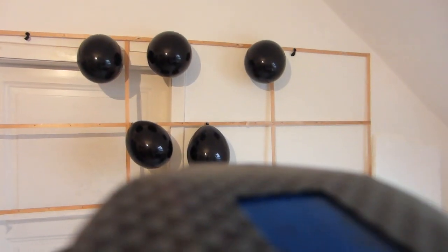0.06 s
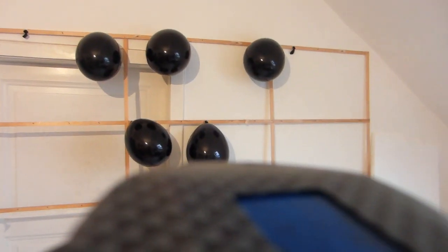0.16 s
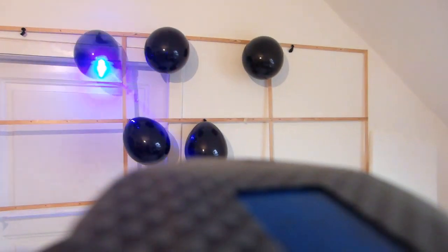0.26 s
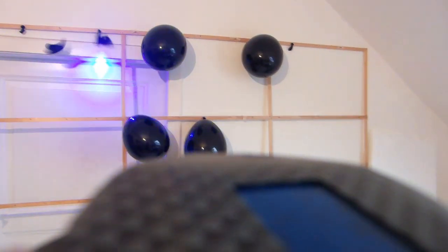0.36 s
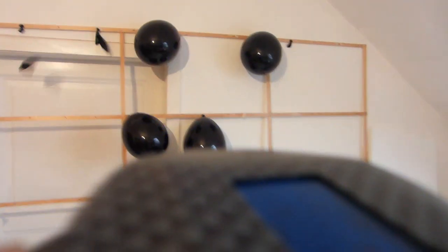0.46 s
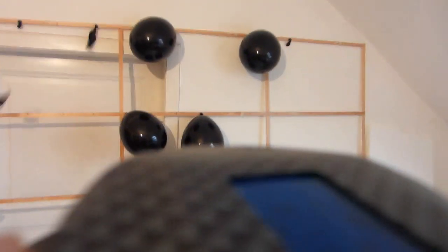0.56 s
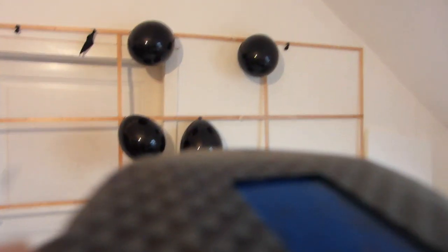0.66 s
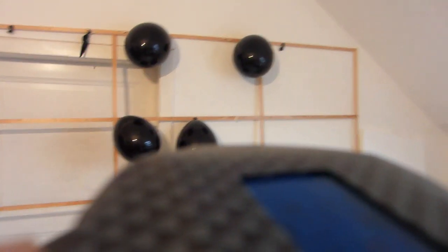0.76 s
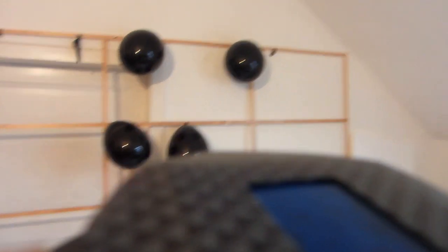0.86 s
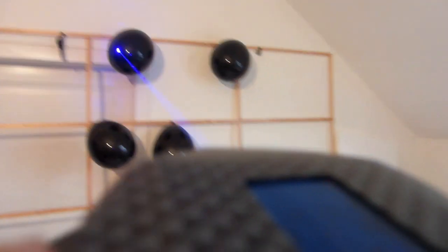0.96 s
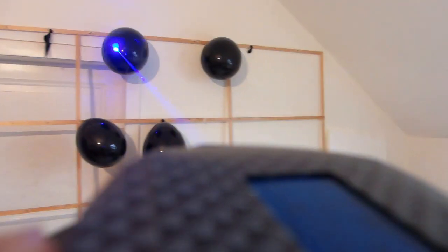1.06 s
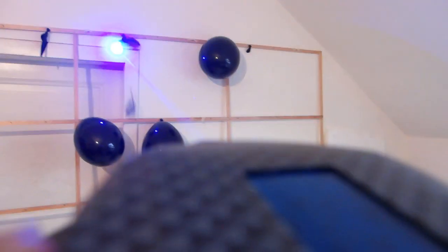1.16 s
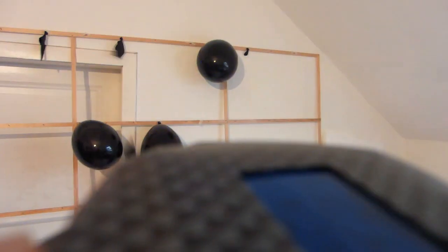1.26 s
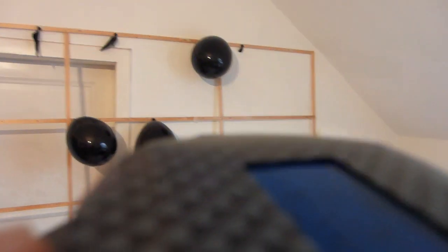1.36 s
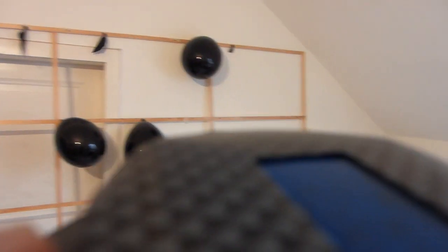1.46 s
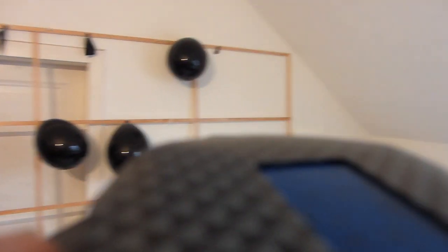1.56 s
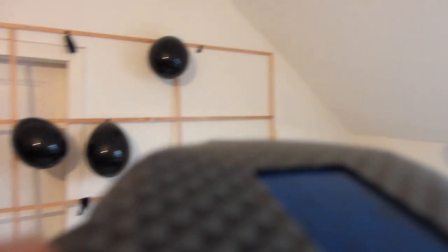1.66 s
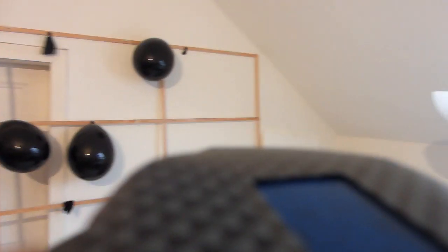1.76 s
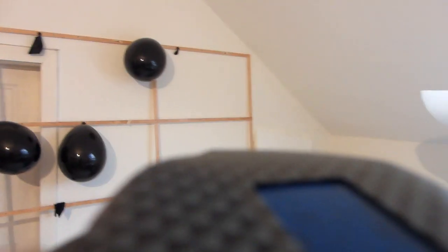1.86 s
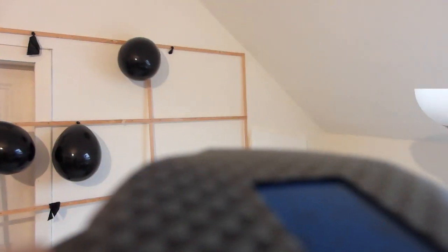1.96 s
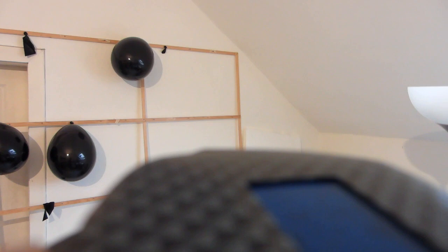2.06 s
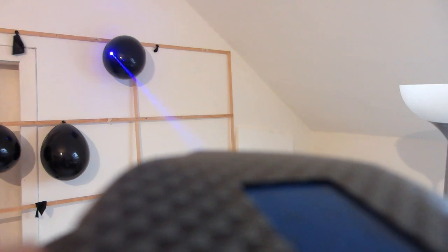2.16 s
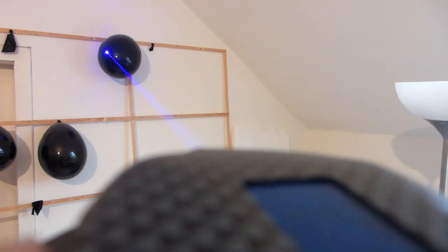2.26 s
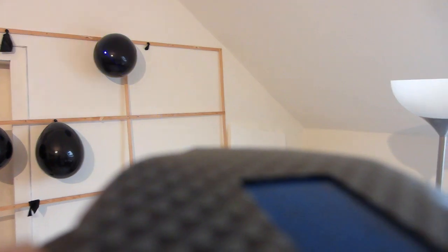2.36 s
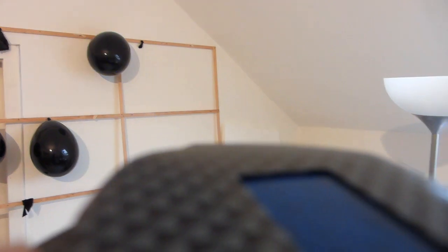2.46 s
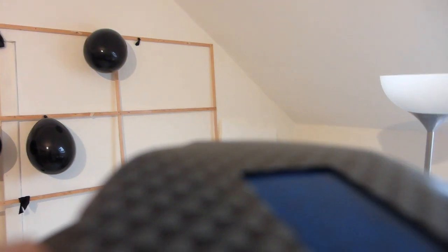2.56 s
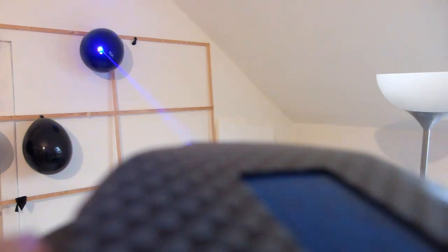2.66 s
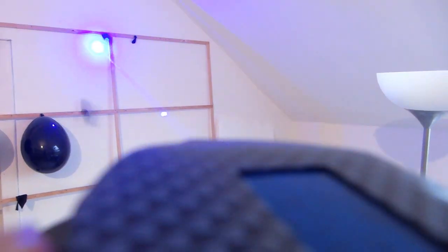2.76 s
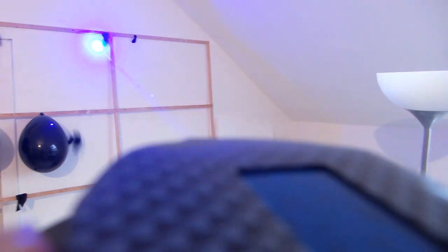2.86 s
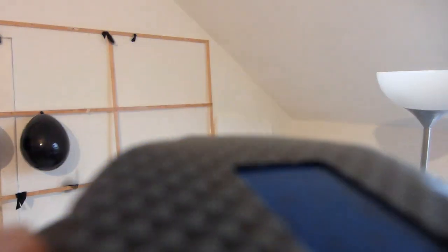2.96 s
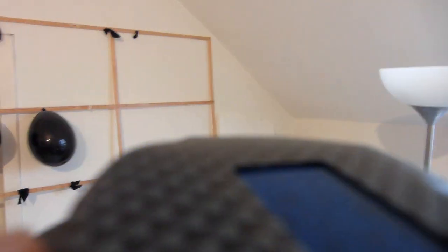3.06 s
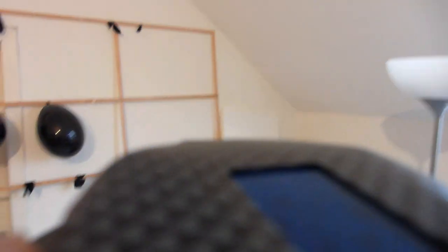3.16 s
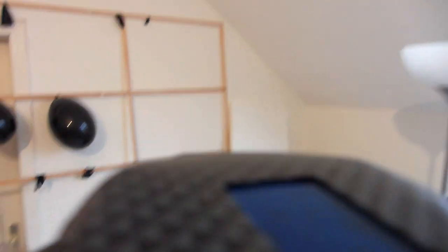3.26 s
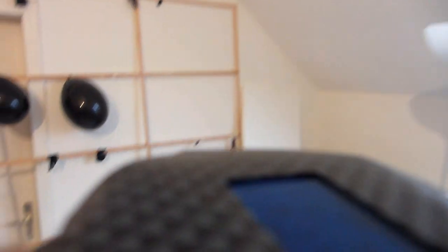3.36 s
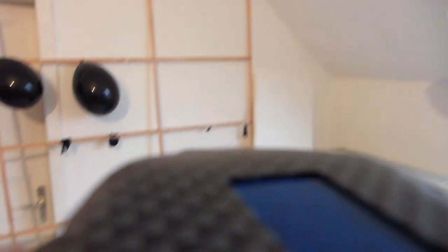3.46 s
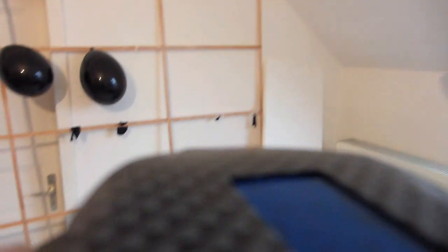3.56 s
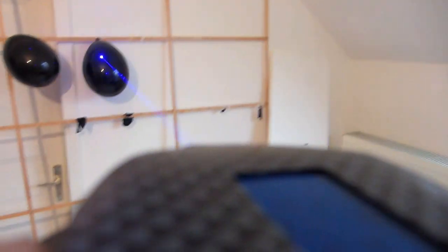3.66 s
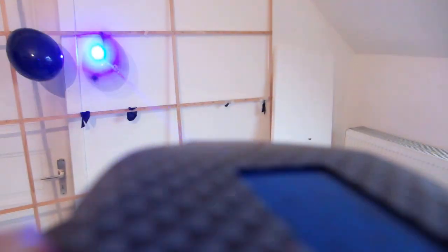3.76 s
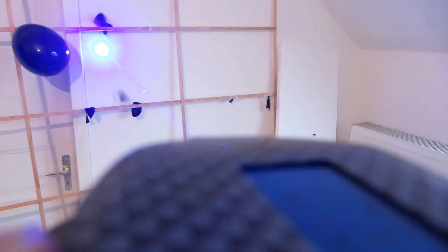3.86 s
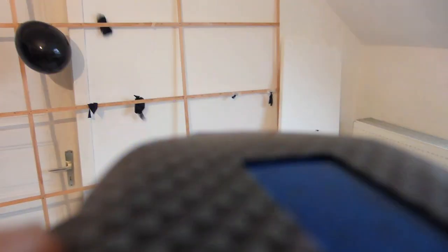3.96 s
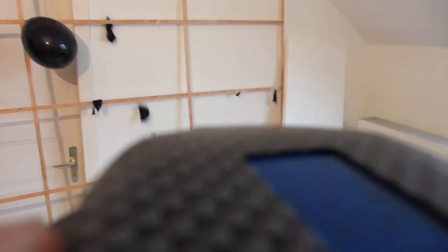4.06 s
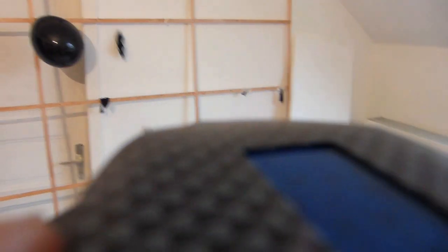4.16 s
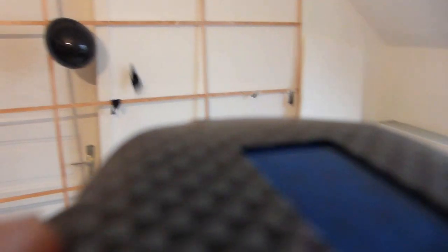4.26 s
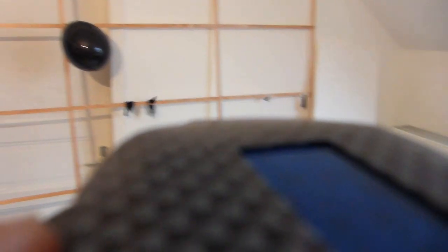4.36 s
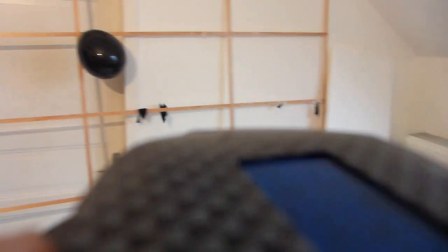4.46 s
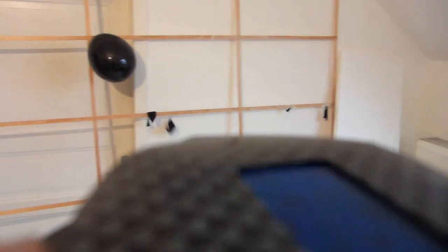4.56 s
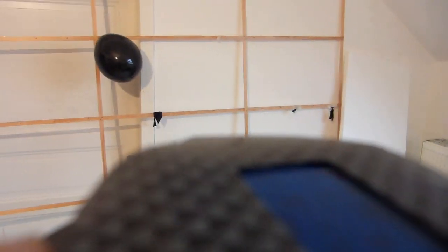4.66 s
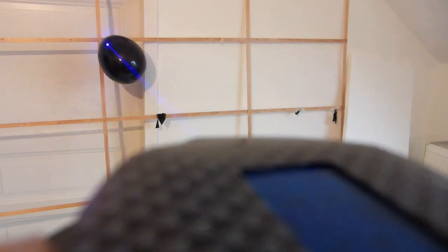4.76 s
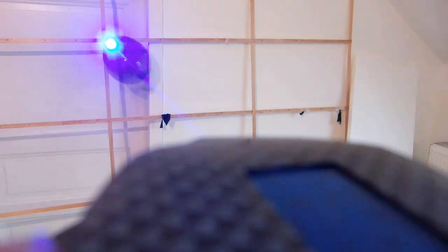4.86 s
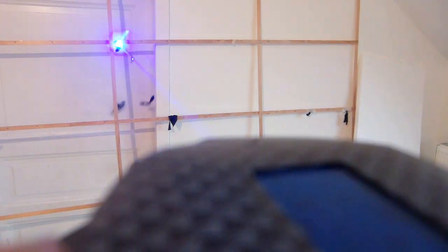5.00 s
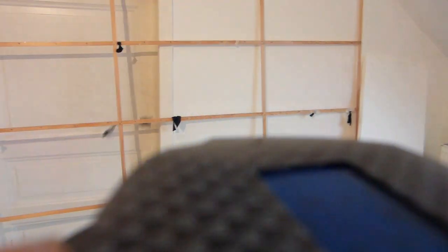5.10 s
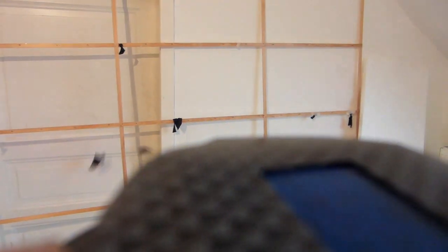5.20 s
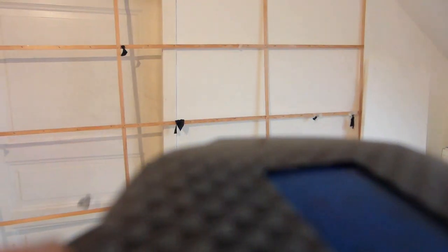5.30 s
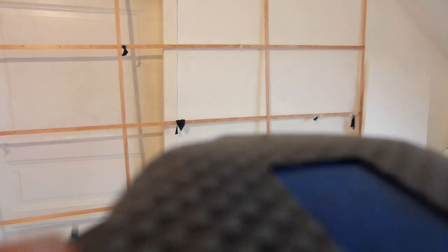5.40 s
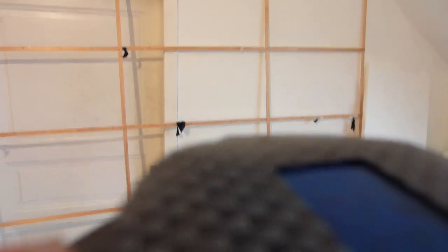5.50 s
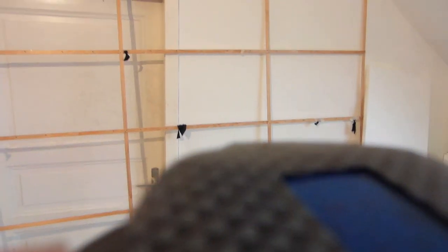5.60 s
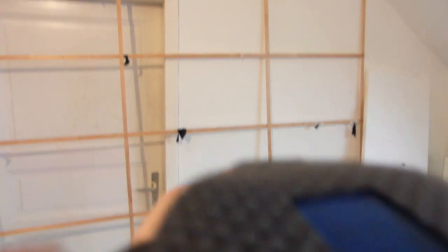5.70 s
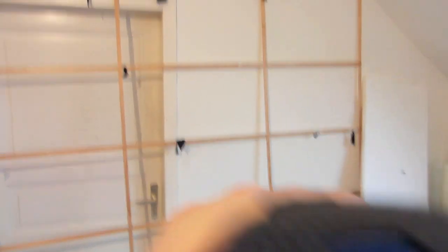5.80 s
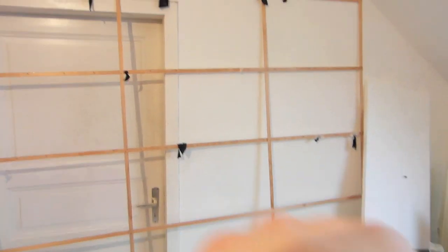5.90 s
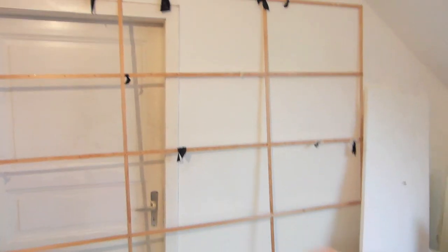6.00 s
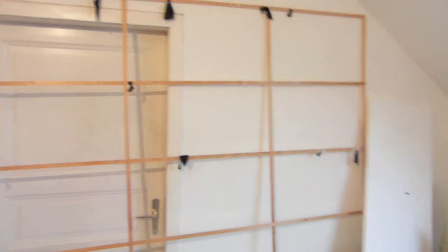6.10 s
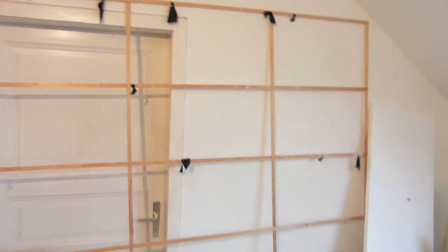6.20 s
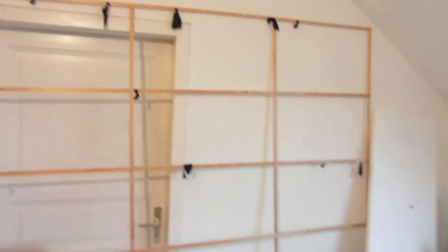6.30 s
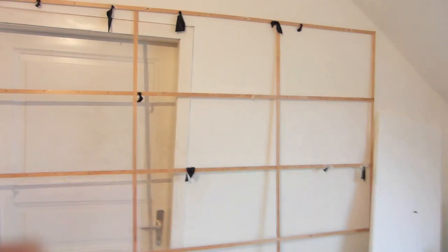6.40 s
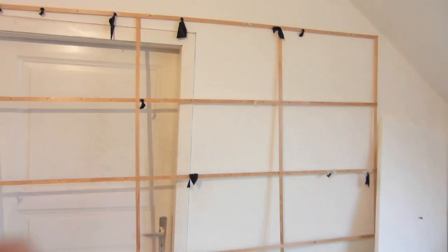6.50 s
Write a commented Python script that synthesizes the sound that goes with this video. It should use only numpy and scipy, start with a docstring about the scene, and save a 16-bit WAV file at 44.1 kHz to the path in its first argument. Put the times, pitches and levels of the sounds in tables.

```python
"""A thin hiss and a low room tone, a tick of a laser's button close by, then a bang: the first of five.
Place: a small bare room, where a hand-held laser bursts rubber balloons; each is one big air swing and a rip.
Echoes and standing waves ring on from decaying noise and tones; shreds slap the floor off to the left.
Close up, fingers rub, click and bump the gear: shaped noise and ringing plastic modes.
Microphone: a wide stereo pair with noise of its own; its limiter ducks and clips at every bang."""
import sys
import numpy as np
from scipy import signal
from scipy.fft import rfft, irfft, next_fast_len
from scipy.io import wavfile
from scipy.ndimage import uniform_filter1d, map_coordinates

SR = 44100
rng = np.random.default_rng(int(sys.argv[2]) if len(sys.argv) > 2 else 0)


def unload_wav(signal):
    """Save mono or channel-first audio to the path in sys.argv[1] as 16-bit WAV at rate SR, clipped to [-1, 1]."""
    wavfile.write(
        sys.argv[1],
        SR,
        np.round(np.clip(np.atleast_2d(signal).T, -1, 1) * 32767).astype(np.int16),
    )


N = 288414  # samples

# Levels are relative: each source adds its own gain to the dB in its table.
# The balloons. Each row: start in seconds, level in dB, air ring in Hz, boom in Hz, boom in dB,
# hollow note in Hz, hollow note in dB, rubber slap in Hz, rubber slap in dB, crack in dB,
# push on the room's bass in dB.
BALLOONS = [(0.2388, -1, 385, 265, 4, 814, 1.5, 1440, 1.5, -0.5, -5),
            (1.046, -1, 438.5, 335, 4, 704, 1, 1770, 1.5, 1, 1.5),
            (2.65, 0, 480, 355, 3, 850, 5.5, 1400, 4, 2, 1),
            (3.7298, 2, 467, 380, 2, 560, 1.5, 1540, 6.5, 2.5, -3),
            (4.8364, -1, 470, 290, 5, 524, 2.5, 1150, 4, -0.5, 2)]
# Colour of a bang in the room. Each row: frequency in Hz, level in dB.
BANG_COLOUR = [(30, -50.5), (75, -20.5), (125, -20), (200, -5), (360, -4), (560, -4), (780, -11),
               (1000, -11), (1400, -14), (2400, -19), (3500, -20.5), (4700, -21.5), (6500, -28.5),
               (9500, -27.5), (13000, -33.5), (15500, -40)]
# First reflections off the near walls. Each row: delay in seconds, level in dB.
NEAR_WALLS = [(.0055, -19.5), (.0135, -23), (.0162, -18), (.028, -25), (.041, -22)]
# How fast the room dies away. Each row: frequency in Hz, t60 in seconds.
ROOM_DECAY = [(80, 0.861), (200, 0.58), (500, 0.5), (1600, 0.57), (4500, 0.49), (9000, 0.4), (15000, 0.29)]
# Standing waves of the room. Each row: frequency in Hz, level in dB, t60 in seconds.
STANDING_WAVES = [(102.6, -28, 0.76), (138.4, -16, .56), (203.3, -14.5, 0.54), (274.7, -15, 0.46),
                  (364.5, -15.5, 0.53), (577, -14.5, 0.6), (706, -23.5, 0.34), (818, -18.5, 0.47)]
# Faint dull after-ring kept by the house: level in dB, t60 in seconds, upper edge in Hz.
LINGER_DB, LINGER_T60, LINGER_HZ = -34.5, 1.14, 1270
# Echoes arrive in bunches: depth in dB, random knots per second.
FLUTTER_DB, FLUTTER_RATE = 1.2, 110

# Shreds of rubber flopping down. Each row: start in seconds, length in seconds, level in dB, thud in dB.
SHRED_FALLS = [(1.59, 0.03, -55, 16), (1.63, 0.094, -50.5, 0.5), (1.7618, 0.02, -47.5, -2.5),
               (3.189, 0.041, -55, 3.5), (3.241, 0.04, -58, 4), (4.3573, 0.018, -43, 2.5),
               (4.378, .009, -45, 1), (4.457, 0.058, -42.5, 6)]
# Colour of the rubber's slap. Each row: frequency in Hz, level in dB.
SLAP_COLOUR = [(60, -12), (300, 0), (600, -3), (1000, -16), (3100, -49), (4500, -30), (6500, -44.5),
               (10000, -43.5), (16000, -49)]
# Resonances of the floor. Each row: centre in Hz, width in Hz, level in dB.
FLOOR_RESONANCES = [(543, 90, -0.5), (1190, 160, -3.5), (1593, 52, -3), (1970, 27, -10), (2310, 53, -21.5)]

# Ticks of the laser's button. Each row: start in seconds, level in dB.
BUTTON_TICKS = [(0.2035, -28.5), (0.9214, -29), (2.07, -30.5), (2.3163, -26.5), (2.5869, -30.5),
                (3.629, -27.5), (4.739, -29.5)]
# Ringing parts of the button. Each row: frequency in Hz, level in dB, t60 in seconds.
BUTTON_RING = [(1700, -21.5, 0.0046), (2700, -18.5, 0.0021), (3700, -20, .0025), (4660, -18, 0.0035),
               (5830, -15.5, 0.0014), (6940, -18, 0.0025), (9220, -12, 0.0043), (10924, 3.5, 0.00095),
               (12530, 0.5, 0.0023), (13300, -7, .003)]
# Clicks of the plastic casing. Each row: start in seconds, level in dB, treble lift in dB.
CASING_CLICKS = [(5.9606, -33.5, 8), (6.1103, -12.5, 6.5), (6.3921, -23, 10)]
# Ringing parts of the casing. Each row: frequency in Hz, level in dB, t60 in seconds.
CASING_RING = [(1630, -11.5, 0.019), (1920, -3.5, 0.015), (2040, -4.5, 0.014), (2283, -9.5, 0.016),
               (2560, -12.5, 0.011), (3002, -17, 0.0088), (3510, -13.5, .006), (4810, -14, 0.011),
               (5900, -12, 0.0072), (8450, -20, 0.0051), (12800, -15, 0.0019)]
# Each click seats again, fainter each time. Each row: delay in seconds, level in dB.
CLICK_REBOUNDS = [(.0018, -10), (.0047, -17), (.0088, -23)]
# Tiny ticks of the grip. Each row: start in seconds, level in dB.
GRIP_TICKS = [(2.017, -65), (2.037, -63), (2.352, -64), (5.538, -61.5), (5.558, -63), (5.581, -57.5),
              (5.671, -60), (5.686, -58), (6.03, -58)]

# Fingers sliding on the casing. Each row: start in seconds, length in seconds, level in dB,
# centre in Hz, hardest press as a share of the stroke.
RUB_STROKES = [(4.244, 0.21, -70, 6000, 0.12), (4.625, 0.17, -60, 3800, 0.05),
               (5.275, 0.22, -70, 5150, 0.207), (5.529, 0.32, -69, 4560, 0.46),
               (5.796, 0.44, -66.5, 2280, 0.28), (6.023, 0.062, -65, 4870, 0.19)]
# Spread in octaves of a stroke centred at 2 kHz, and the extra spread per octave higher.
RUB_OCTAVES, RUB_WIDENS = 0.7, 0.267
RUB_EDGE_DB = 17.5  # a stroke starts and ends this much under its hardest press
RUB_RING_HZ, RUB_RING_DB = 4550, 5  # the casing resonance that colours every stroke
# The grip scuffing the casing. Each row: start in seconds, length in seconds, level in dB, treble lift in dB.
GRIP_SCUFFS = [(5.807, 0.052, -65.5, -3), (5.852, 0.12, -62, -4), (5.984, 0.055, -62, 1),
               (6.066, .028, -54, -3), (6.171, .022, -65.5, -7), (6.42, 0.038, -56, 2),
               (6.476, 0.029, -66, 0)]
SWELL_S = 0.078  # a run of contacts this long swells and fades throughout; shorter ones start more abruptly
# Soft bumps of the hand. Each row: start in seconds, length in seconds, level in dB.
HAND_BUMPS = [(1.836, 0.018, -49.5), (1.937, 0.022, -48), (2.394, .026, -42), (5.738, 0.012, -47),
              (6.018, 0.011, -49.5), (6.454, 0.0064, -41)]
# Colour of a bump. Each row: frequency in Hz, level in dB per Hz.
BUMP_COLOUR = [(40, -12), (100, 9), (160, 4.5), (280, -4), (450, -6), (800, -13), (1200, -18), (2500, -35),
               (8000, -68)]
# The housing's low knock: Hz, t60 in seconds, dB over the bump's level for a bump of 30 ms.
KNOCK_HZ, KNOCK_T60, KNOCK_DB = 138, 0.15, 2

# Colour of the room tone. Each row: frequency in Hz, level in dB.
ROOM_TONE_COLOUR = [(20, -2), (150, -5), (300, -7), (500, -10.5), (720, -20), (1700, -24), (3400, -34.5),
                    (8000, -41.5), (12000, -45.5), (15500, -56)]
# Level of the room tone along the scene. Each row: time in seconds, level in dB.
ROOM_TONE_LEVEL = [(0, -62.5), (1.6, -55.5), (2.199, -57), (3.4, -54.5), (4.6, -56), (5.6, -58), (6.5, -60)]
ROOM_TONE_DRIFT_DB = -1.5  # scale of its random wander
# Noise of each microphone port. Each row: frequency in Hz, level in dB per Hz.
PORT_NOISE_COLOUR = [(20, 0.5), (100, -2), (500, -8), (1500, -19), (4000, -26), (9000, -38), (15500, -39)]
# Stereo width: gain on the side signal. Each row: frequency in Hz, gain in dB.
STEREO_WIDTH = [(100, -20), (280, -18), (600, -12), (1000, -4.5), (1500, 2), (2500, 6.5), (4500, 10.5),
                (12000, 12)]
# Stereo balance. Each row: frequency in Hz, left over right in dB.
STEREO_LEAN = [(200, 2), (700, 1.2), (1400, 3), (2200, 0.6), (3800, 3.5), (6500, -0.34)]
TOP_HZ = 15600  # upper edge of the finished sound


def amp(db):
    """Decibels to an amplitude factor."""
    return 10 ** (np.asarray(db) / 20)


def seconds(length):
    """A time axis in seconds."""
    return np.arange(int(length * SR)) / SR


def fade(db, t, t60):
    """An exponential decay from a level in dB, losing 60 dB in t60 seconds."""
    return amp(db - 60 * t / t60)


def unit(x):
    """x scaled to rms 1."""
    return x / np.sqrt(np.mean(x ** 2) + 1e-20)


def along(points, hz):
    """Read (Hz, value) points on a log-frequency axis."""
    f, v = np.transpose(points)
    return np.interp(np.log(hz + 1), np.log(f + 1), v)


def bell(hz, centre_hz, octaves):
    """A bump of height 1 on a log-frequency axis."""
    return np.exp(-.5 * (np.log2((hz + 1) / centre_hz) / octaves) ** 2)


def filtered(x, response):
    """x times a response of frequency."""
    n = x.shape[-1]
    m = next_fast_len(n + SR // 10)
    return irfft(rfft(x, m) * response(np.fft.rfftfreq(m, 1 / SR)), m)[..., :n]


def noise(size, response):
    """Two unrelated channels of coloured noise, of rms 1 together."""
    return unit(filtered(rng.standard_normal((2, size)), response))


def wobble(size, rate):
    """A smooth random curve, rate knots a second."""
    knots = rng.standard_normal(int(size * rate / SR) + 4)
    return map_coordinates(knots, [np.arange(size) * rate / SR])


def add(track, s, sound):
    """Mix a sound in at s seconds."""
    start = max(0, round(s * SR))
    part = track[..., start:start + sound.shape[-1]]
    part += sound[..., :part.shape[-1]]


def blasts(blast_db=19, swing_s=0.0047, lag_s=.0001, rip_db=-2, rip_hz=2200, rip_t60=0.009):
    """The skin rips and freed air swings once, hard, reaching the left port first; near walls repeat it."""
    out, t = np.zeros((2, N)), seconds(1 / 20)
    for s, db, ring_hz, *_ in BALLOONS:
        # starting an eighth of a cycle in makes the front steep
        swing = -amp(db + blast_db - 60 * (t / swing_s) ** 2) * np.sin(2 * np.pi * ring_hz * t + np.pi / 4)
        rip = fade(db + rip_db, t, rip_t60) * noise(len(t), lambda hz: bell(hz, rip_hz, 2.2))
        wave = swing + rip
        add(out[0], s, wave[0])
        add(out[1], s + lag_s, wave[1])
        for delay, wall_db in NEAR_WALLS:
            # every balloon hangs in its own place
            add(out, s + delay * rng.uniform(.9, 1.2), amp(wall_db) * wave)
    return out


def echoes(room_db=0.32, early_db=4.5, early_t60=0.1, gap_s=.0017, build_s=0.0007,
           bass_hz=145, early_low_hz=260):
    """After a short gap the walls answer: dense early echoes, a long decay, standing waves, an after-ring."""
    out, t = np.zeros((2, N)), seconds(2)

    def bang(hz):
        return amp(along(BANG_COLOUR, hz))

    for (s, db, _, boom_hz, boom_db, note_hz, note_db,
         slap_hz, slap_db, crack_db, bass_db) in BALLOONS:
        def own_colour(hz):
            # size and stretch set boom, note, slap and crack; the balloon's place sets how it drives the bass
            balloon_db = boom_db * bell(hz, boom_hz, 0.22) + note_db * bell(hz, note_hz, .2)
            skin_db = slap_db * bell(hz, slap_hz, .25) + crack_db * bell(hz, 4000, 1.0)
            return amp(balloon_db + skin_db + bass_db * bell(hz, bass_hz, .45))

        tail = dying(noise(len(t), bang), patchy_db=1.1)[:, :len(t)]
        early = noise(len(t), lambda hz: bang(hz) * hz / (hz + early_low_hz)) * fade(early_db, t, early_t60)
        dull = noise(len(t), lambda hz: bang(hz) / (1 + (hz / LINGER_HZ) ** 2))
        after_ring = dull * fade(LINGER_DB, t, LINGER_T60)
        bunched = (tail + early) * amp(FLUTTER_DB * wobble(len(t), FLUTTER_RATE))
        answer = filtered(bunched + after_ring + standing_waves(t), own_colour)
        add(out, s + gap_s, amp(db + room_db) * answer * (1 - np.exp(-t / build_s)))
    return out


def dying(x, patchy_db=0, bunch_s=0.28):
    """Each frequency fades at the room's own speed, ever more unevenly as echoes bunch and beat."""
    hz, t, z = signal.stft(x, SR, nperseg=512)
    rough = rng.standard_normal(z.shape[1:])
    patches = unit(uniform_filter1d(uniform_filter1d(rough, size=6, axis=0), size=7, axis=1))
    uneven_db = patchy_db * patches * np.minimum(t / bunch_s, 1)
    fall_db = 60 * t / along(ROOM_DECAY, hz)[:, None]
    return signal.istft(z * amp(uneven_db - fall_db), SR, nperseg=512)[1]


def standing_waves(t, rise_s=0.015, scatter_db=4.5):
    """The room's low modes build up and ring on, alike at both ports: mid only, no side."""
    ring = 0
    for hz, db, t60 in STANDING_WAVES:
        level = fade(db + rng.normal(0, scatter_db), t, t60)
        ring = ring + level * np.sin(2 * np.pi * (hz * t + rng.random()))
    return np.outer([1, 0], ring * (1 - np.exp(-t / rise_s)))


def shreds(slaps_per_s=950, spread_db=4, thud_hz=450, left_db=9.0):
    """A limp shred lands off to the left fold by fold, in quick slaps; the heavier, the more it thuds."""
    out = np.zeros((2, N))
    for s, length, db, thud_db in SHRED_FALLS:
        slaps = patter(length, slaps_per_s, spread_db)
        landing = filtered(slaps, lambda hz: floorboards(hz) * amp(thud_db * bell(hz, thud_hz, 1.0)))
        add(out, s, amp(db) * unit(landing))
    return microphone(out) * amp(np.array([[.5], [-.5]]) * left_db)


def floorboards(hz):
    """Damped resonances of the floor, with the slap of the rubber over them."""
    boards = sum(amp(db) * width * hz / (centre ** 2 - hz ** 2 + 1j * width * hz)
                 for centre, width, db in FLOOR_RESONANCES)
    return np.hypot(np.abs(boards) / (1 + (hz / 2800) ** 6), amp(along(SLAP_COLOUR, hz)))


def patter(length, per_s, spread_db):
    """A short run of tiny, uneven contacts, as mid and side."""
    size = int(max(length, .005) * SR)
    times = np.cumsum(rng.uniform(1 / 4, 7 / 4, size)) * SR / per_s
    at = times[times < size].astype(int)
    strengths = amp(spread_db * rng.standard_normal(size)) * rng.choice([-1, 1], (2, size))
    contacts = np.zeros((2, size))
    contacts[:, at] = strengths[:, :len(at)]
    swell = signal.windows.tukey(size, np.clip(length / SWELL_S, 1 / 5, 1))
    return np.pad(contacts * swell, ((0, 0), (0, SR // 100)))  # 10 ms left to ring


def clicks(scatter_db=-27, scatter_t60=0.047):
    """The laser's button ticks thinly; the casing clacks lower, rebounds and scatters off hand and gear."""
    out, t = np.zeros((2, N)), seconds(1 / 8)
    for s, db in BUTTON_TICKS:
        tick = snap(BUTTON_RING, bright_db=7.5, crack_hz=7000, crack_db=-4.5, crack_t60=0.00084,
                    wet_db=-23.5, mid_db=2.0)
        add(out, s, amp(db) * tick)

    def clack(bright_db):
        return snap(CASING_RING, bright_db, crack_hz=4530, crack_db=-15.0, crack_t60=0.0096,
                    wet_db=-33, mid_db=-3.5)

    for s, db, bright_db in CASING_CLICKS:
        add(out, s, amp(db) * clack(bright_db))
        for delay, rebound_db in CLICK_REBOUNDS:
            add(out, s + delay, amp(db + rebound_db) * clack(bright_db=-7))
        scatter = noise(len(t), lambda hz: np.sqrt(casing(hz)) * bell(hz, 1900, 0.69))
        add(out, s, fade(db + scatter_db, t, scatter_t60) * scatter)
    return out


def fidgets(bright_db=13.5):
    """The grip shifts now and then and the casing gives faint, bright ticks."""
    out = np.zeros((2, N))
    for s, db in GRIP_TICKS:
        tick = snap(CASING_RING, bright_db, crack_hz=6000, crack_db=-4, crack_t60=0.0061,
                    wet_db=-39, mid_db=-1.5)
        add(out, s, amp(db) * tick)
    return out


def snap(modes, bright_db, crack_hz, crack_db, crack_t60, wet_db, mid_db):
    """A small part snaps over close by: a crack, a brief ring, a faint room answer, as mid and side."""
    t = seconds(1 / 2)
    ring = 0
    for hz, db, t60 in modes:
        level = fade(db + rng.normal(0, 1), t, t60)
        ring = ring + level * np.sin(2 * np.pi * (hz * rng.normal(1, .005) * t + rng.random()))
    crack = noise(len(t), lambda hz: bell(hz, crack_hz, 0.63))[0] * fade(crack_db, t, crack_t60)

    def thin_and_bright(hz):
        low_cut = 1 - 1 / (1 + (hz / 1350) ** 6)
        return amp(bright_db * bell(hz, 6300, 1.0)) * low_cut

    direct = filtered((ring + crack) * (1 - np.exp(-t / 0.0004)), thin_and_bright)
    walls = dying(rng.standard_normal((2, len(t))))
    answer = signal.fftconvolve(direct[None], walls / np.linalg.norm(walls[0]), axes=1)[:, :len(t)]
    return direct * amp([[mid_db], [0]]) + amp(wet_db) * answer


def casing(hz):
    """The damped resonances of the plastic casing, their powers summed."""
    power = 0
    for centre, db, t60 in CASING_RING:
        width = np.log(1000) / (np.pi * t60)  # a faster decay means a wider resonance
        power = power + np.abs(amp(db) * hz / (centre ** 2 - hz ** 2 + 1j * width * hz)) ** 2
    return np.sqrt(power)


def rubs(grain_db=3.5, grain_rate=420):
    """Skin slides over plastic; each stroke swells and eases away, the brighter the broader its hiss."""
    out = np.zeros((2, N))
    for s, length, db, centre_hz, press in RUB_STROKES:
        share = np.linspace(0, 1, int(length * SR))
        octaves = RUB_OCTAVES + RUB_WIDENS * np.log2(centre_hz / 2000)

        def colour(hz):
            return bell(hz, centre_hz, octaves) * amp(RUB_RING_DB * bell(hz, RUB_RING_HZ, 0.14))

        hiss = noise(len(share), colour)
        grainy = unit(hiss * amp(grain_db * wobble(len(share), grain_rate)))
        press_db = np.interp(share, [0, np.clip(press, 0, 1), 1], [-RUB_EDGE_DB, 0, -RUB_EDGE_DB])
        soft_ends = signal.windows.tukey(len(share), 1 / 10)
        add(out, s, amp(db) * grainy * unit(amp(press_db) * soft_ends))
    return out


def scuffs(slips_per_s=550, spread_db=5, bright_hz=4000, dull_hz=6500):
    """The grip sticks and slips in short runs; every slip rings the casing."""
    out = np.zeros((2, N))
    for s, length, db, bright_db in GRIP_SCUFFS:
        def colour(hz):
            return casing(hz) / (1 + (hz / dull_hz) ** 2) * amp(bright_db * bell(hz, bright_hz, 0.99))

        slips = patter(length, slips_per_s, spread_db)
        add(out, s, amp(db) * unit(filtered(slips, colour)))
    return out


def bumps(left_db=12.5):
    """The hand bumps with a dull puff to the left and rocks the housing, the more the longer it pushes."""
    out, t = np.zeros((2, N)), seconds(1 / 8)
    for s, length, db in HAND_BUMPS:
        size = int(max(length, .005) * SR)
        puff = noise(size, lambda hz: amp(along(BUMP_COLOUR, hz))) * signal.windows.tukey(size, 3 / 4)
        add(out, s, amp(db) * puff)
        push = length / .03
        knock = push * fade(db + KNOCK_DB, t, KNOCK_T60) * np.sin(2 * np.pi * KNOCK_HZ * t)
        add(out[0], s + length / 6, knock)
    return microphone(out) * amp(np.array([[.5], [-.5]]) * left_db)


def room_tone(hiss_db=-69, hiss_hz=7000, modes_db=2.5):
    """A wandering low rumble gathers on the standing waves; a thin hiss lies over it until the first bang."""
    def colour(hz):
        gathered = sum(bell(hz, centre, 0.026) for centre, *_ in STANDING_WAVES)
        return amp(along(ROOM_TONE_COLOUR, hz) + modes_db * gathered)

    t = np.arange(N) / SR
    level_db = np.interp(t, *np.transpose(ROOM_TONE_LEVEL)) + ROOM_TONE_DRIFT_DB * wobble(N, 5.1)
    before_first_bang = t < BALLOONS[0][0]
    hiss = amp(hiss_db) * noise(N, lambda hz: bell(hz, hiss_hz, 1.0)) * before_first_bang
    return amp(level_db) * noise(N, colour) + hiss


def self_noise(level_db=-60.5):
    """Each port has a faint rumble and hiss of its own."""
    return amp(level_db) * noise(N, lambda hz: amp(along(PORT_NOISE_COLOUR, hz)))


def microphone(field, notch_hz=7850, notch_db=-11, notch_octaves=0.037):
    """Mid and side to left and right: bass nearly mono, treble mostly side, with one narrow notch."""
    mid, side = filtered(field, lambda hz: amp(notch_db * bell(hz, notch_hz, notch_octaves)))
    side = filtered(side, lambda hz: amp(along(STEREO_WIDTH, hz)))
    left_right = np.array([mid + side, mid - side])
    return filtered(left_right, lambda hz: amp(np.outer([.5, -.5], along(STEREO_LEAN, hz))))


def scene():
    """Bangs and their echoes, falling shreds and the noises of handling, as left and right."""
    mid_side = echoes() + clicks() + fidgets() + rubs() + scuffs() + room_tone()
    return blasts() + shreds() + bumps() + microphone(mid_side) + self_noise()


def record(dry, ceiling_db=0.0, release_db_per_s=55):
    """The limiter bites a moment late, so each front clips; its slow release stretches the decay."""
    t = np.arange(N) / SR
    level = uniform_filter1d(np.abs(dry).max(axis=0), size=16)  # averaging softens the thinnest spikes
    over_db = np.maximum(20 * np.log10(np.abs(level) + 1e-9) - ceiling_db, 0)
    # hold the deepest duck so far, letting go at a steady rate
    release_db = release_db_per_s * t
    duck_db = np.maximum.accumulate(over_db + release_db) - release_db
    keep = np.exp(-1 / (.0006 * SR))  # 0.6 ms of lag
    duck_db = signal.lfilter([1 - keep], [1, -keep], duck_db)
    clipped = np.clip(dry * amp(-duck_db), -.96, .96)
    return filtered(clipped, lambda hz: 1 / (1 + (hz / TOP_HZ) ** 100))


dry = scene()
out = record(dry)
unload_wav(out)
```